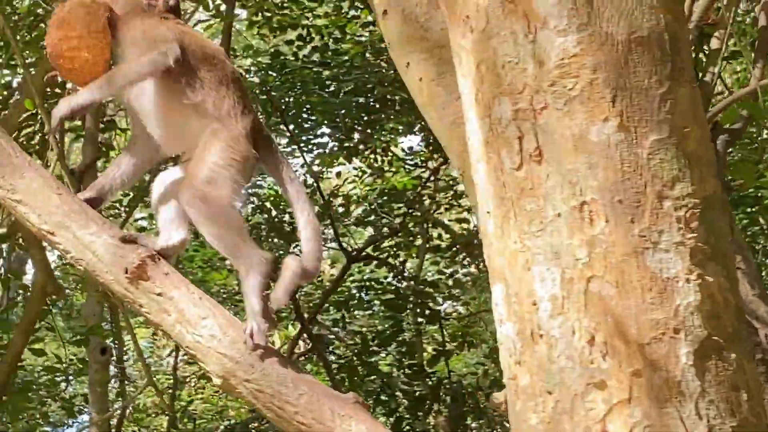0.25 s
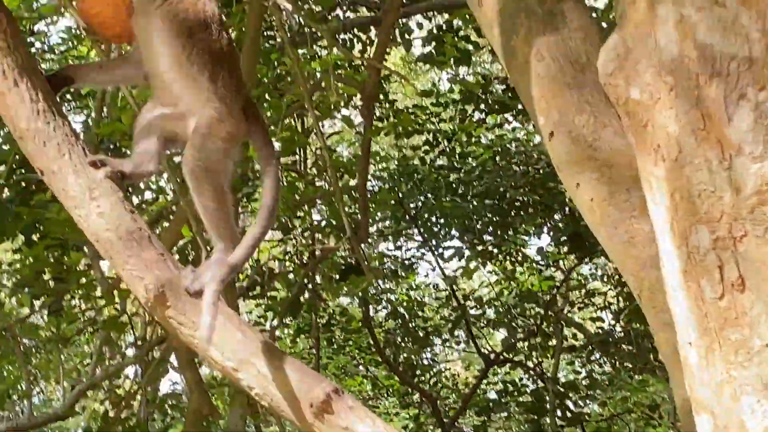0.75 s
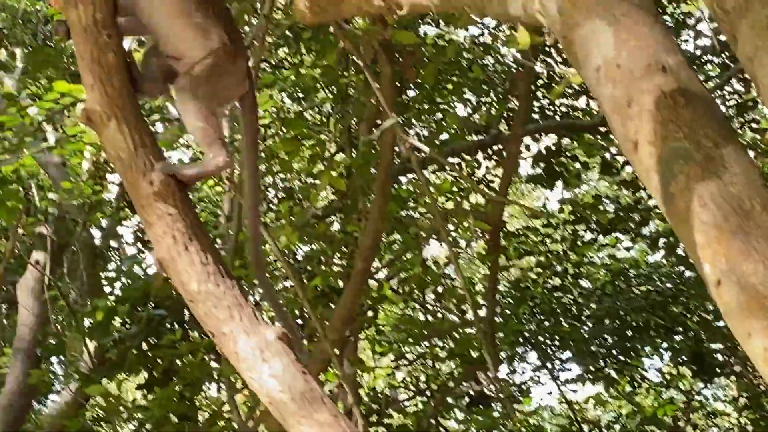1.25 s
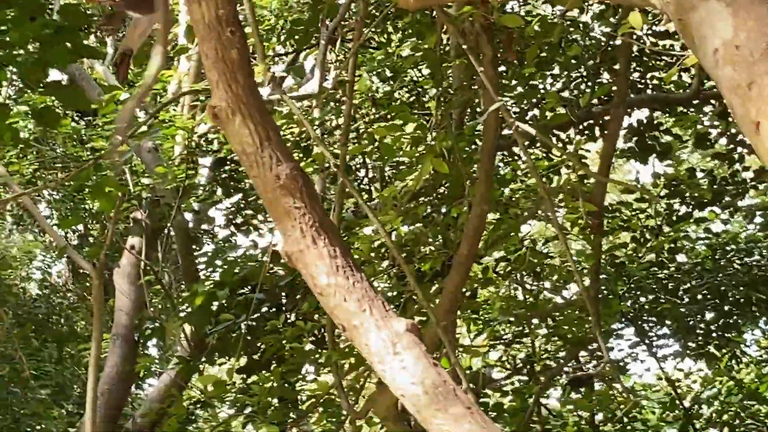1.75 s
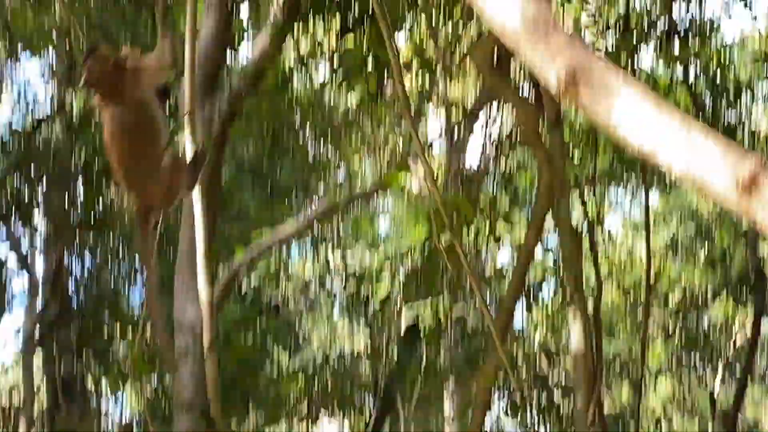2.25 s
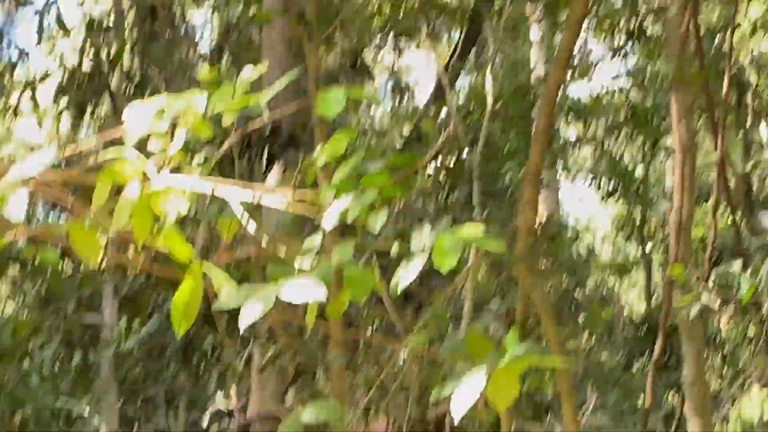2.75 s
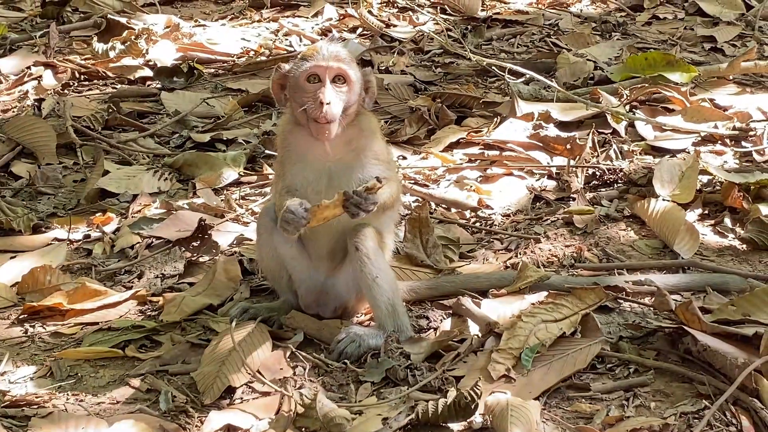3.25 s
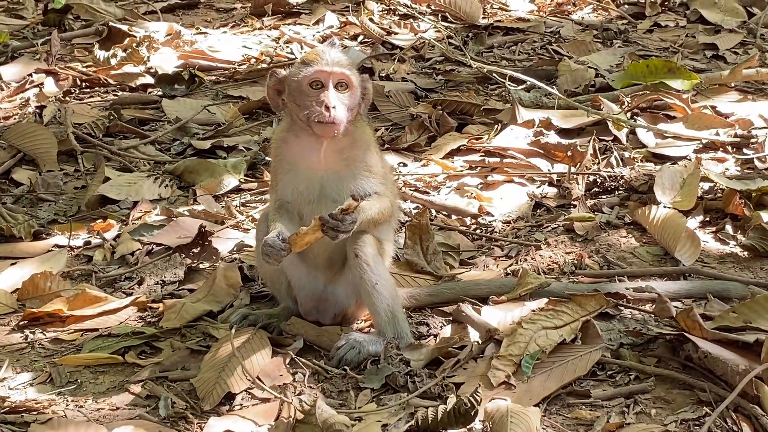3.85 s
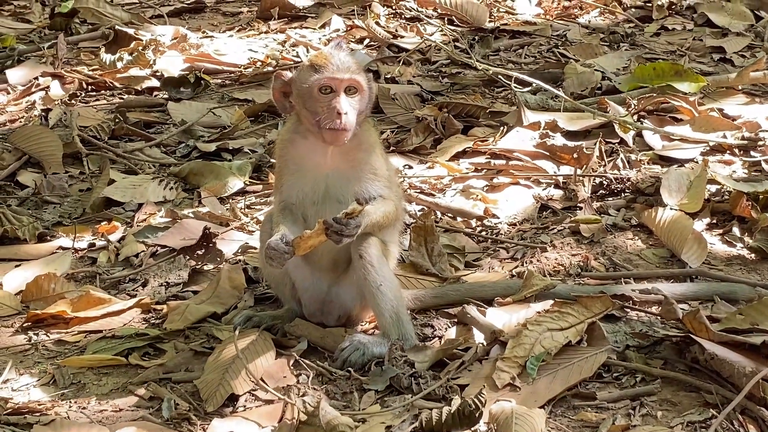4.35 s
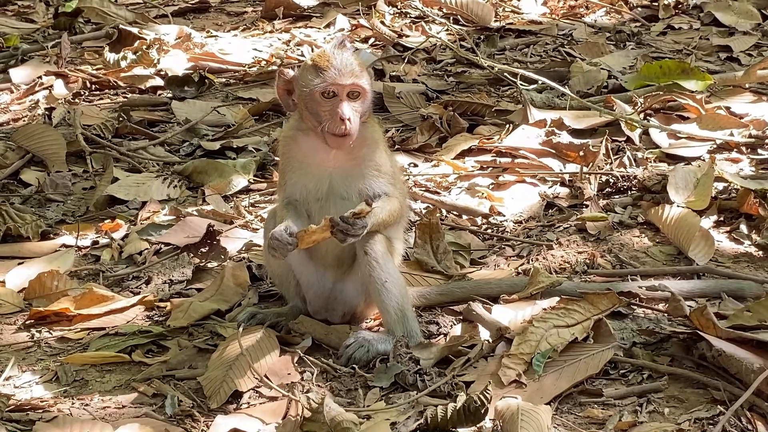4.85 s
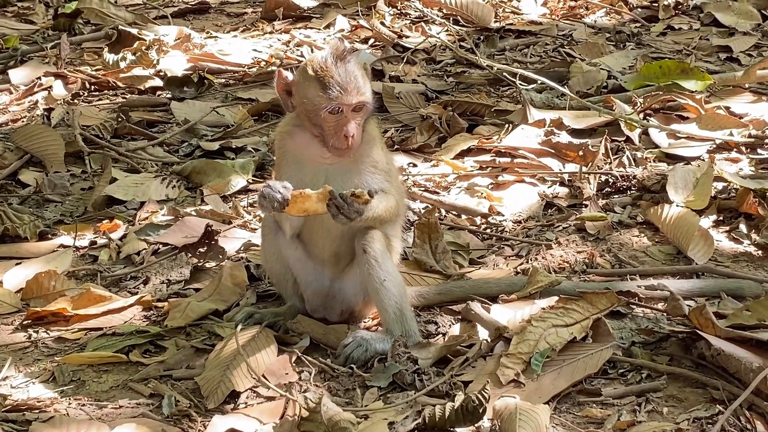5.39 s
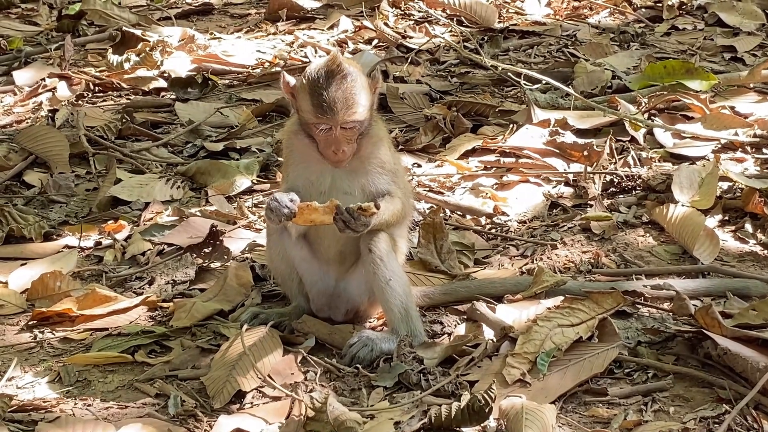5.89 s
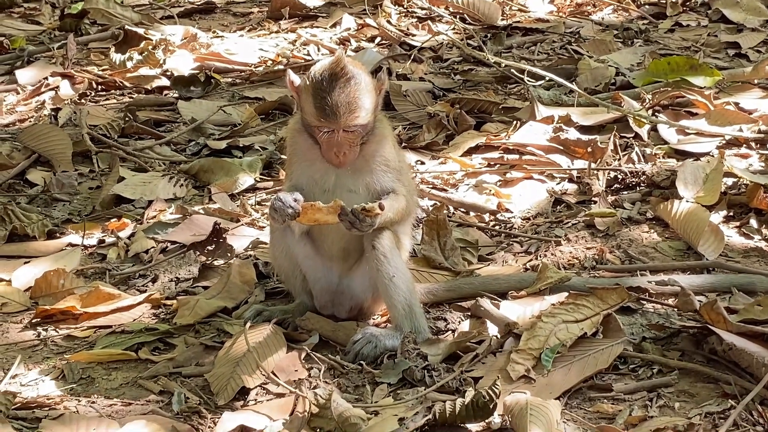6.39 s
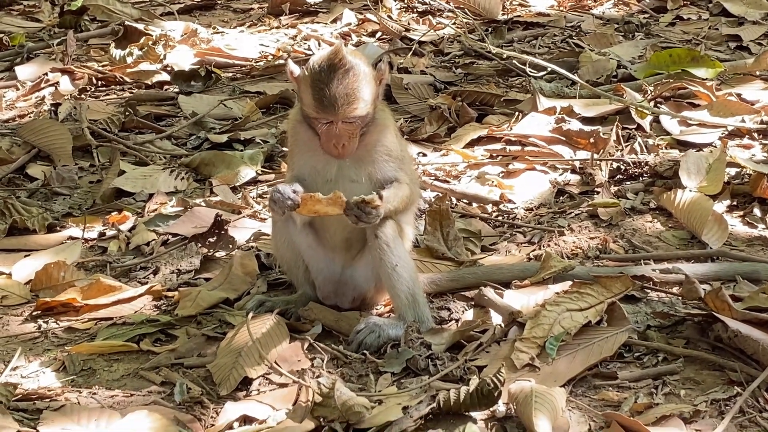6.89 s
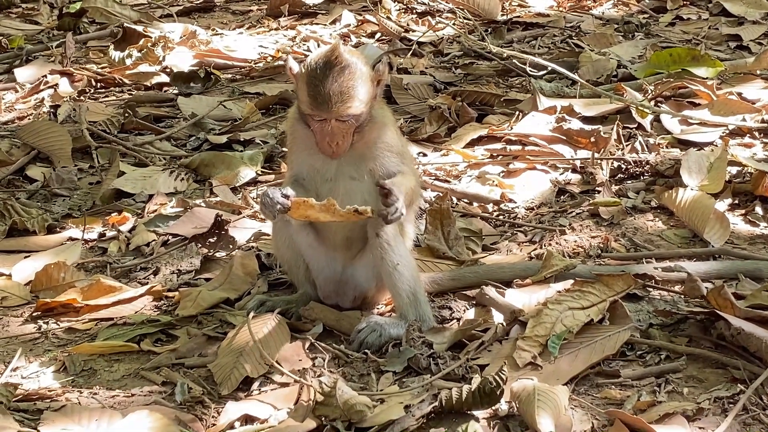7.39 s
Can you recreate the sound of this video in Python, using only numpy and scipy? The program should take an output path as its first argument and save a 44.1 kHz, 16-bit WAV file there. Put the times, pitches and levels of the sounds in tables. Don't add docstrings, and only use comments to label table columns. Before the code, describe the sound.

A dense cicada chorus rings throughout, a narrow, piercing tone near 2.7 kHz with bright shimmering overtones, over forest hiss and low hum. From 0 to 2.8 seconds dry leaves crackle, twigs snap sharply around 0.15 and 0.5, and bark scrapes hollowly. Wind buffets the microphones in low lumps from about 0.7, and fingers tap the case, most strongly near 2.7. A falling whistle sounds at 2.2. At 2.81 everything drops out for a blink. The chorus returns a little softer, the wind gone, with a distant engine thudding about fourteen times a second, swelling around 6. A very hard knock with a scrape cracks at 4.06. Small birds chirp, then swoop downward repeatedly from 5.8 to 7.4, with another falling whistle at 6.8. Dull release bumps cluster from 6.55 to 6.8, then at 7.2 and 7.3.

```python
import sys
import numpy as np
from scipy import signal
from scipy.fft import rfft, irfft, next_fast_len
from scipy.io import wavfile
from scipy.ndimage import uniform_filter1d

SR = 44100
rng = np.random.default_rng(int(sys.argv[2]) if len(sys.argv) > 2 else 0)


def magnitude_from_level(level_db):
    exponent = np.asarray(level_db, float) / 20
    return 10 ** exponent


def bounce(signal):
    frames = np.transpose(np.atleast_2d(signal))
    limited = np.clip(frames, -1, 1)
    pcm = np.round(limited * 32767).astype(np.int16)
    wavfile.write(sys.argv[1], SR, pcm)


N = 336483
CUT_S, RESUME_S = 2.806, 2.8245

# time in seconds, level in dB.
CHORUS_LEVEL = [(0, -45), (.7, -45), (2.1, -45.5), (2.8, -45.5), (2.83, -49.5), (3.7, -50), (4.4, -49),
                (5.2, -49.5), (6.8, -49), (7.63, -49.5)]
# centre in Hz, width in Hz, level in dB, throb in dB.
SONG_BANDS = [(2705, 17.6, -0.5, .5), (2663, 170, -9, -1), (2515, 310, -22, 3), (3100, 100, -37.5, -2)]
OVERTONE_BANDS = [(5363, 50, -0.5, 1.5), (5299, 412, -6, 0.43), (8097, 69, -8, 2), (7910, 580, -14.5, 2),
                  (10660, 320, -22, 1.87), (10340, 1500, -27.5, 2.034), (13600, 637, -34, 3.7)]
CRICKET_BANDS = [(5940, 80, -72, 2.5), (3200, 90, -78, 3.3), (1520, 300, -81, 2.5)]
# song level in dB, overtone level in dB, pitch waver in Hz.
NEAR_SINGER = [
    (-4, 0, 20.15),
    (4, 8.5, 11.19),
]
# overtones in dB re song, high air in dB, low air in dB, leaf bed in dB.
VIEWS = [
    (0.34, -61.5, -56.5, -66),
    (-0.66, -60.5, -55.5, -111),
]
# frequency in Hz, level in dB.
LEAF_COLOUR = [(400, -5), (1000, -20.5), (2500, 7), (5000, 4), (9000, 5), (13000, 2.5), (16500, -6.5)]
# start in seconds, length in seconds, level in dB.
RUSTLES = [(0.0, 0.058, -65), (.13, 0.044, -58), (.37, .03, -59), (.42, 0.089, -63), (.515, 0.045, -51),
           (.58, 0.058, -57), (.725, 0.068, -71), (.83, 0.033, -49.5), (.985, .03, -54),
           (1.375, 0.078, -51.5), (1.62, .08, -62), (1.84, 0.056, -65), (2.19, 0.21, -71),
           (2.37, 0.057, -61), (2.5, 0.52, -60), (2.83, 0.13, -69), (3.7, 0.045, -61), (3.985, .025, -64),
           (4.053, .005, -35), (4.735, .025, -66), (5.09, .025, -69), (6.58, 0.034, -52), (6.94, .025, -63)]
SCRAPES = [(.41, 0.27, -60.5), (.7, 0.12, -69), (.82, 0.17, -62), (.97, 0.45, -59), (1.68, 0.17, -56),
           (1.9, 0.082, -52), (2.0, 0.42, -60), (2.24, 0.16, -55), (2.45, 0.23, -55), (2.685, 0.034, -42.5),
           (2.74, .08, -47.5), (4.035, .03, -39.5), (4.075, 0.035, -48), (4.09, 0.16, -59.5),
           (4.29, 0.18, -49)]
# time in seconds, level in dB.
WIND_LEVEL = [(0, -73), (.55, -66), (.85, -43.5), (1.9, -45), (2.05, -41), (2.8, -42)]
# frequency in Hz, level in dB per Hz.
WIND_COLOUR = [(15, -41), (25, 3), (49, 3), (72, 5.5), (104, 0.5), (254, -22), (500, -24.5), (1100, -100)]
# time in seconds, bump in dB, gust behind it in dB.
WIND_BUMPS = [(0.721, -27, -63), (0.857, -24, -40), (1.062, -25, -45), (1.263, -26, -44), (1.451, -33, -42),
              (1.54, -29, -59), (1.876, -32, -44), (2.011, -48, -30.5), (2.137, -32, -33),
              (2.252, -27, -39), (2.419, -27, -52), (2.672, -31, -35.5)]
# start in seconds, firings per second.
FIRING_RATE = [
    (2.85, 13.0),
    (3.1, 14.208),
    (4.3, 15.595),
    (6.4, 15.426),
]
# time in seconds, level in dB.
ENGINE_LEVEL = [(2.82, -61.5), (3.4, -56), (4, -63.5), (4.5, -52.5), (5.5, -57.5), (5.9, -49), (6.3, -47.5),
                (6.6, -57.5), (7.63, -54.5)]
# time in seconds, level in dB, thump in dB re push, tick in dB re push.
CASE_TAPS = [(0.71, -51, -14, -28), (0.83, -56, -14, -30), (2.341, -45, -16, -35), (2.544, -48, -7, -39),
             (2.677, -25, 4, -41), (2.725, -42, -11, -38), (2.768, -44, -6, -41),
             (2.799, -42.5, -17, -36.5), (2.839, -46.5, -18, -34), (2.984, -48.5, -16, -40)]
CASE_KNOCKS = [
    (3.996, -37, -31.5, -21),
    (4.056, -3.5, -33.5, -29.5),
]
CASE_RELEASES = [
    (6.551, -35.5, 6, -46),
    (6.664, -48, -3, -40),
    (6.685, -30.5, 2, -40),
    (6.706, -29.5, -15, -38),
    (6.727, -25.5, 2, -40),
    (6.767, -25.5, -1, -35),
    (6.815, -25.5, -1, -35),
    (7.225, -28, -6, -43),
    (7.294, -22, 5, -51),
]
# sign, push in seconds, stiffness in Hz, wall null in Hz, wall ring in Hz.
GRIPS = [
    (-0.97, 0.00139, 520, 335, 510),
    (-1.29, 0.00128, 280, 454, 551),
    (0.82, 0.0014, 20, 486, 532),
]
# time in seconds, level in dB, colour
# in Hz.
TWIG_SNAPS = [(0.1546, -31, 3940), (0.162, -43, 3500), (.836, -46, 1080), (0.1964, -58, 3800),
              (1.2644, -45, 2000), (1.723, -42, 3800), (2.5885, -48, 3700), (4.3994, -47, 1700),
              (5.8321, -50, 3394), (0.5159, -29, 5860), (0.5219, -37, 4200), (0.5274, -36, 6000),
              (2.8414, -47, 6000), (3.492, -50, 6000), (3.9916, -37, 6500), (3.9974, -43, 6500),
              (4.7481, -42, 7000), (5.1001, -43, 7000), (6.5907, -41, 8000), (6.9469, -43, 9000),
              (4.0557, -31.5, 11000)]
# start in seconds, length in seconds, resting pitch in Hz, level in dB.
WHISTLES = [
    (2.198, 0.17, 2100, -46.5),
    (6.772, 0.23, 2170, -48),
]
# start in seconds, length in seconds, start pitch in Hz, end pitch in Hz, level in dB.
CHIRPS = [
    (0.39, 0.031, 6360, 6800, -57),
    (0.446, 0.072, 6950, 6800, -61),
    (3.577, 0.019, 3880, 4760, -63),
    (3.602, 0.14, 3520, 3560, -68),
    (4.598, 0.022, 3650, 4800, -62),
    (5.485, .105, 4800, 3800, -59.5),
]
# start in seconds, length in seconds, level in dB.
SWOOPS = [
    (5.81, .09, -59.5),
    (5.965, .062, -61),
    (6.308, .078, -57),
    (6.475, .078, -59.5),
    (6.655, .06, -63),
    (7.21, .09, -58),
    (7.405, .075, -63),
]
# frequency in Hz, level in dB per Hz.
HIGH_AIR_COLOUR = [(900, -18.5), (1800, 1.5), (3000, 5), (4200, -5.5), (6500, 0), (9000, -31),
                   (12000, -10.5), (16000, -15)]
HUM_COLOUR = [(30, 14.5), (60, 23.5), (120, 17), (320, 6), (600, 3.5), (1600, 0.5), (2500, -8.5),
              (5000, -36)]
# time in seconds, level in dB.
HUM_LEVEL = [(0, 0), (2.8, 1.5), (3.2, -3), (4.2, 0.5), (4.9, -0.5), (5.6, -1), (6.2, 3.5), (6.9, -1.5),
             (7.63, -0.5)]
# frequency in Hz, likeness from 0 to 1.
PORT_LIKENESS = [(100, .97), (600, .88), (1500, .6), (2700, .97), (5000, .995), (9800, .999), (11500, .93),
                 (13200, .995)]
# frequency in Hz, lead of the left in radians.
PORT_LEAD = [(0, 0), (500, -.55), (1500, .15), (2700, .27), (4500, 0), (6900, -.05), (9220, -3.14),
             (16000, -13.5)]

SIZE = next_fast_len(N + SR // 4)
HZ = np.fft.rfftfreq(SIZE, 1 / SR)
TIME = np.arange(N) / SR
MIX_ANGLE = np.arccos(np.interp(HZ, *np.transpose(PORT_LIKENESS))) / 2


def cicadas():
    song_db, over_db, waver_hz = (np.where(TIME < CUT_S, a, b) for a, b in zip(*NEAR_SINGER))
    phase = 2 * np.pi * np.cumsum(2702 + waver_hz * drift(38.4)) / SR
    near_song = magnitude_from_level(song_db + 2.5 * drift(60)) * np.sin(phase)
    song = evened(singers(SONG_BANDS, 40) + near_song)
    harmonics = np.sin(2 * phase) + magnitude_from_level(-17.0) * np.sin(3 * phase) + magnitude_from_level(-26.5) * np.sin(4 * phase)
    near_overtones = magnitude_from_level(over_db + 2.7 * drift(30)) * harmonics
    overtones = evened(singers(OVERTONE_BANDS, 30) + near_overtones)
    chorus = magnitude_from_level(0.41) * song + magnitude_from_level(per_view(0) + drift(2.1)) * overtones
    crickets = magnitude_from_level(-5.0 * (TIME < CUT_S)) * singers(CRICKET_BANDS, 13)
    return magnitude_from_level(curve(CHORUS_LEVEL)) * chorus + crickets


def singers(bands, throb_hz):
    out = np.zeros((2, N))
    for hz, width_hz, db, throb_db in bands:
        resonance = 1 / (1 + (2 * (HZ - hz) / width_hz) ** 2)
        band = paired(rng.standard_normal((2, N)), resonance)
        out += band * np.sqrt(width_hz / bands[0][1]) * magnitude_from_level(db + throb_db * drift(throb_hz))
    return out


def leaves():
    crackle = paired(grains(5000, 3.4), magnitude_from_level(read(LEAF_COLOUR, HZ)))
    crackle *= magnitude_from_level(4.0) * (strokes(RUSTLES, 0.26, -15.0) + magnitude_from_level(per_view(3) + 3.0 * drift(8.9)))
    hollow = paired(grains(3000, 2.0), 1 / (1 + abs((HZ - 610) / 150) ** 2.6))
    scrape = magnitude_from_level(-2.5) * strokes(SCRAPES, 0.15, -10.5) * magnitude_from_level(1.5 * drift(25)) * hollow
    return crackle + scrape


def grains(per_s, spread_db):
    size = magnitude_from_level(spread_db * np.minimum(rng.exponential(1, (2, N)), 5)) * rng.standard_normal((2, N))
    return size * (rng.random((2, N)) < per_s / SR)


def wind():
    gust_rows = [(s - .02, 0.083, db) for s, _, db in WIND_BUMPS]
    gusts = strokes(gust_rows, 0.11, -14.5) + magnitude_from_level(curve(WIND_LEVEL))
    rumble = paired(rng.standard_normal((2, N)), magnitude_from_level(read(WIND_COLOUR, HZ)))
    rumble *= gusts * magnitude_from_level(-3.5 + 0.47 * drift(20))
    bumps = np.zeros(N)
    for s, db, _ in WIND_BUMPS:
        add(bumps, s, magnitude_from_level(db - 8.5) * push(0.007))
    return (rumble + bumps) * (TIME < CUT_S)


def knocks():
    out = np.zeros((2, N))
    give = np.exp(-np.arange(3000) / SR / 0.0046)
    for grip, table in zip(GRIPS, (CASE_TAPS, CASE_KNOCKS, CASE_RELEASES)):
        sign, push_s, stiff_hz, null_hz, ring_hz = grip
        for s, db, thump_db, tick_db in table:
            hit = np.zeros(3000)
            add(hit, 0, push(push_s))
            hit += magnitude_from_level(thump_db - 36.5) * signal.oaconvolve(hit, give)[:3000]
            hit = signal.lfilter(*signal.butter(1, stiff_hz, "high", fs=SR), hit)
            hit = wall(hit, null_hz, ring_hz, 140)
            hit = wall(hit, 898, 870, 235)
            hit = sign * magnitude_from_level(db + 4.0) * hit / abs(hit).max()
            add(out[0], s - .00115, magnitude_from_level(-.3) * hit)
            add(out[1], s - .00121, magnitude_from_level(.3) * hit)
            for port in out:
                add(port, s - .0003, sign * magnitude_from_level(db + tick_db + 22) * push(0.0003))
    return out


def push(length_s):
    return signal.windows.hann(max(round(length_s * SR), 4))


def wall(x, null_hz, ring_hz, width_hz):
    zero = np.exp(2j * np.pi * (null_hz + .03j * null_hz) / SR)
    pole = np.exp(2j * np.pi * (ring_hz + .5j * width_hz) / SR)
    top = np.poly([zero, zero.conj()]).real
    bottom = np.poly([pole, pole.conj()]).real
    return signal.lfilter(top / top.sum() * bottom.sum(), bottom, x)


def engine():
    start_s, per_s = np.transpose(FIRING_RATE)
    rate_hz = per_s[np.searchsorted(start_s, TIME) - 1] * (TIME > start_s[0])
    fired = np.flatnonzero(np.diff(np.floor(np.cumsum(rate_hz) / SR + .88)) > 0)
    chance = rng.standard_normal((len(fired), 2))
    jittered = np.clip(fired + (60 * chance[:, 0]).astype(int), 0, N - 1)
    train = np.zeros(N)
    train[jittered] = magnitude_from_level(2.9 * chance[:, 1])
    pipe = 1 / (1 + 1j * 2.57 * (HZ / 95 - 95 / (HZ + 1))) / (1 + (HZ / 185) ** 6)
    thuds = evened(irfft(rfft(train, SIZE) * pipe, SIZE)[:N])
    scattered = thuds + magnitude_from_level(-6.0) * evened(trunks(thuds, 0.13))
    return magnitude_from_level(curve(ENGINE_LEVEL) - 3.0) * scattered * (TIME > RESUME_S)


def birds():
    out = np.zeros(N)
    for s, length_s, rest_hz, db in WHISTLES:
        t = np.arange(0, length_s, 1 / SR)
        high = np.exp(-(t / .053) ** 1.75)
        loud = magnitude_from_level(db - 7.0 * high - 7.0 * (t / length_s) ** 2) * signal.windows.tukey(len(t), .15)
        add(out, s, loud * np.sin(2 * np.pi * np.cumsum(rest_hz + 1150 * high) / SR))
    calls = [(*row, 3 if row[3] < row[2] else 1) for row in CHIRPS]
    calls += [(s, length_s, 6450, 3620, db, .9) for s, length_s, db in SWOOPS]
    flutter = evened(uniform_filter1d(rng.standard_normal((len(calls), 5000)), size=150))
    for (s, length_s, start_hz, end_hz, db, bend), chance in zip(calls, flutter):
        u = np.linspace(0, 1, min(round(length_s * SR), 5000))
        pitch_hz = start_hz + (end_hz - start_hz) * u ** bend + 65 * chance[:len(u)]
        loud = magnitude_from_level(db + 3 + 2 * chance[::-1][:len(u)]) * signal.windows.tukey(len(u), .4)
        add(out, s, loud * np.sin(2 * np.pi * np.cumsum(pitch_hz) / SR))
    return out


def twigs():
    out = np.zeros(N)
    chance = rng.standard_normal((len(TWIG_SNAPS), 600))
    for (s, db, hz), noise in zip(TWIG_SNAPS, chance):
        burst = noise * np.exp(-np.arange(600) / SR * hz / 5)
        colour = signal.iirpeak(min(hz, 15000), 1.1, SR)
        burst = signal.lfilter(*colour, signal.lfilter(*colour, burst))
        add(out, s + 0.00022, magnitude_from_level(db + 4.5) * burst / abs(burst).max())
    return out


def air():
    high = paired(rng.standard_normal((2, N)), magnitude_from_level(read(HIGH_AIR_COLOUR, HZ)))
    high *= magnitude_from_level(per_view(1) + .8 * drift(6))
    low = paired(rng.standard_normal((2, N)), magnitude_from_level(read(HUM_COLOUR, HZ)))
    low *= magnitude_from_level(per_view(2) + curve(HUM_LEVEL) + 1.3 * drift(4.5))
    return high + low


def trunks(x, t60_s):
    t = np.arange(SR) / SR
    a, b = rng.standard_normal((2, SR)) * magnitude_from_level(-60 * t / t60_s) * (t > .006)
    tail = np.array([a + 0.19 * b, a - 0.12 * b])
    return signal.fftconvolve(x[None], tail / np.linalg.norm(tail[0]), axes=1)[:, :N]


def paired(source, gain):
    a, b = rfft(source, SIZE) * gain
    a, b = np.cos(MIX_ANGLE) * a, np.sin(MIX_ANGLE) * b
    return evened(irfft(np.array([a + b, a - b]), SIZE)[:, :N])


def strokes(rows, rise, fade_db):
    out = np.zeros(N)
    for s, length_s, db in rows:
        u = np.linspace(0, 1, round(2 * length_s * SR))
        swell = np.clip(2 * u / rise, 0, 1) * np.clip(4 - 4 * u, 0, 1)
        add(out, s, magnitude_from_level(db + fade_db * (2 * u) ** 2) * swell)
    return out


def drift(hz):
    step = np.arange(0, N + 200, 200)
    lowpass = signal.butter(2, min(hz * 400 / SR, .9))
    slow = evened(signal.lfilter(*lowpass, rng.standard_normal(len(step))))
    return np.interp(np.arange(N), step, slow)


def per_view(column):
    return np.where(TIME < CUT_S, VIEWS[0][column], VIEWS[1][column])


def curve(rows):
    return np.interp(TIME, *np.transpose(rows))


def read(points, hz):
    f, value = np.transpose(points)
    return np.interp(np.log(hz + 1), np.log(f + 1), value)


def evened(x):
    return x / np.sqrt(np.mean(x ** 2) + 1e-20)


def add(mix, s, sound):
    part = mix[round(s * SR):][:len(sound)]
    part += sound[:len(part)]


def scene():
    calls, snaps = birds(), twigs()
    first = TIME < CUT_S
    dulled = signal.lfilter(*signal.butter(2, 3300, fs=SR), calls)
    far = magnitude_from_level(3) * (trunks(dulled * first, 1.9) * first + trunks(dulled * ~first, 1.9))
    near = magnitude_from_level(-4) * trunks(calls, .25) + magnitude_from_level(-8) * trunks(snaps, .1)
    return cicadas() + leaves() + wind() + knocks() + engine() + calls + snaps + far + near + air()


def low_pass(x):
    return signal.sosfilt(signal.butter(12, 16800, fs=SR, output="sos"), x)


def record(dry):
    lead = np.interp(HZ, *np.transpose(PORT_LEAD)) / 2
    smear_cycles = 1.4
    lag = -2 * np.pi * smear_cycles * np.log(np.clip(HZ, 55, 3000) / 3000)
    lag = np.where(HZ < 55, lag + 2 * np.pi * smear_cycles * (1 - HZ / 55), lag)
    response = 1 / np.sqrt(1 + (45 / (HZ + 1)) ** 8)
    response *= np.interp(HZ, [15800, 15900, 16750, 16850], [1, .08, .05, 0])
    phase = np.array([lead, -lead]) + lag
    x = irfft(rfft(dry, SIZE) * response * np.exp(1j * phase), SIZE)[:, :N]
    recovery_db = TIME * 1600.0
    over_db = np.maximum(20 * np.log10(abs(x).max(0) + 1e-9) - 4, 0)
    held_db = np.maximum.accumulate(over_db + recovery_db) - recovery_db
    x = np.tanh(x / magnitude_from_level(np.maximum(held_db, 0)))
    gate = (TIME < CUT_S) + np.clip((TIME - RESUME_S) / 0.0036, 0, 1) + 0.0028
    return low_pass(x * np.minimum(gate, 1))


dry = scene()
out = record(dry)
bounce(out)
```